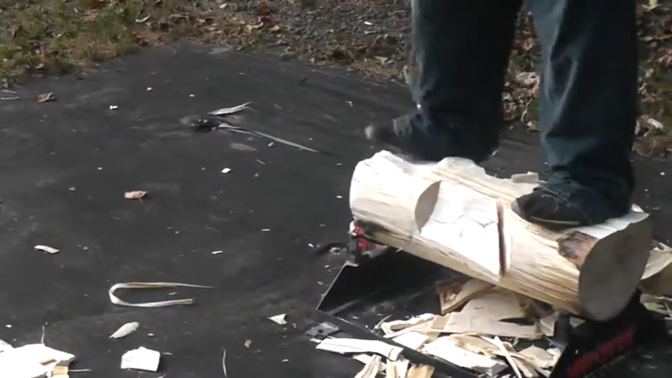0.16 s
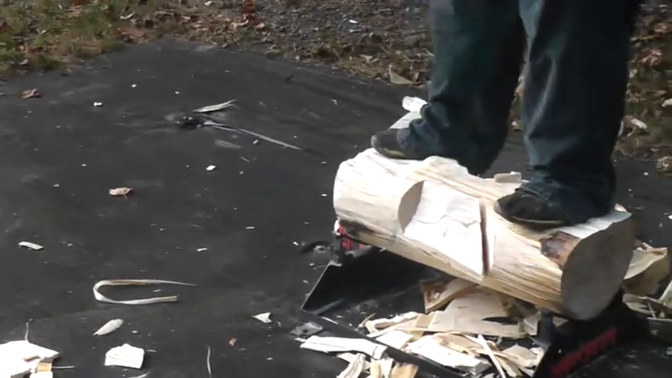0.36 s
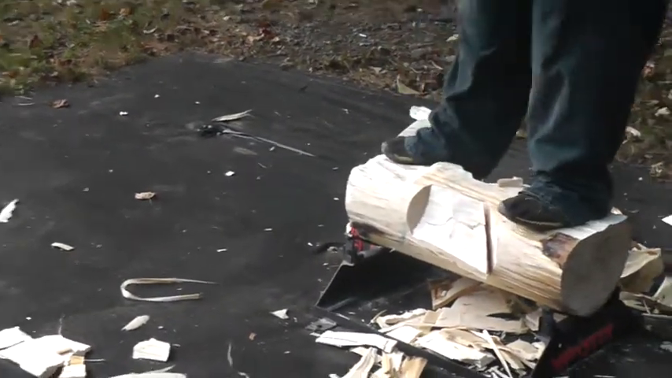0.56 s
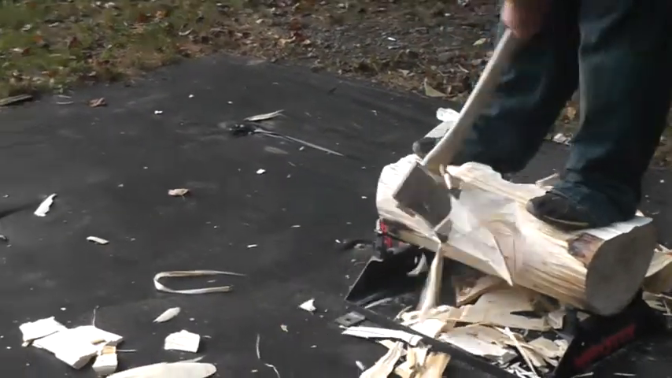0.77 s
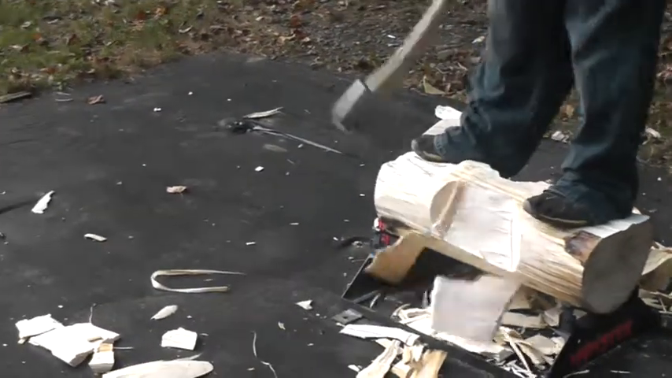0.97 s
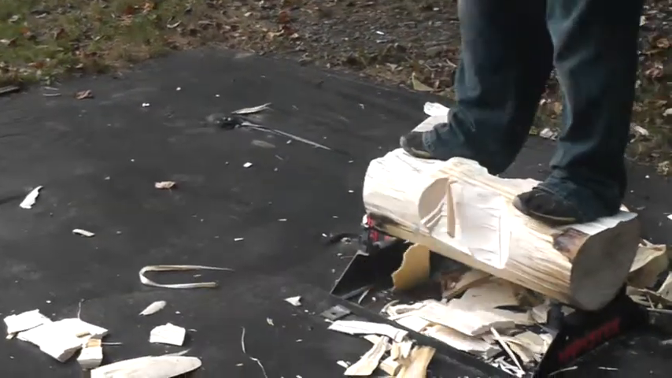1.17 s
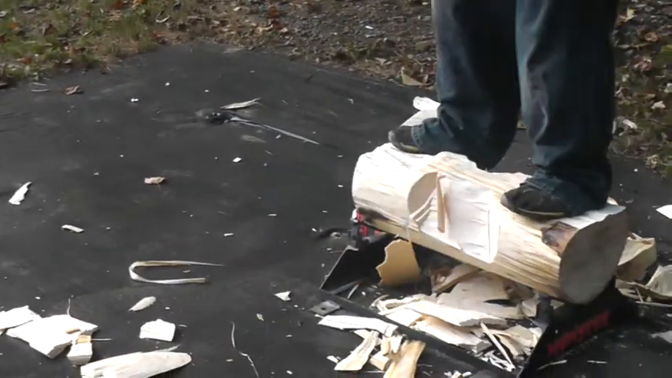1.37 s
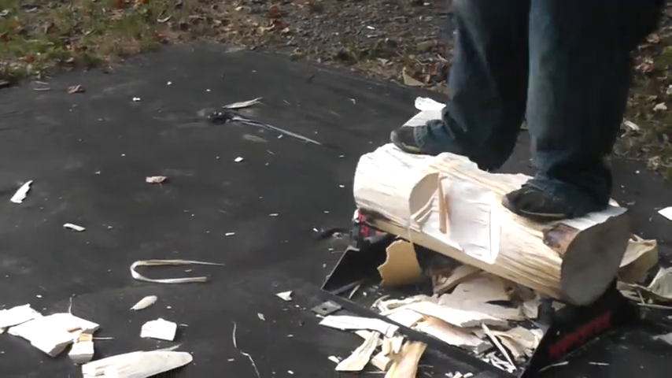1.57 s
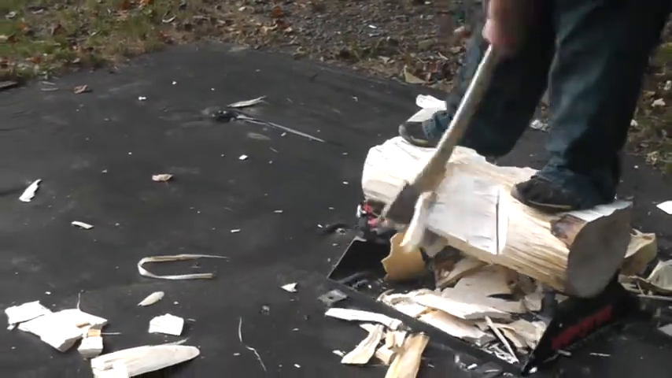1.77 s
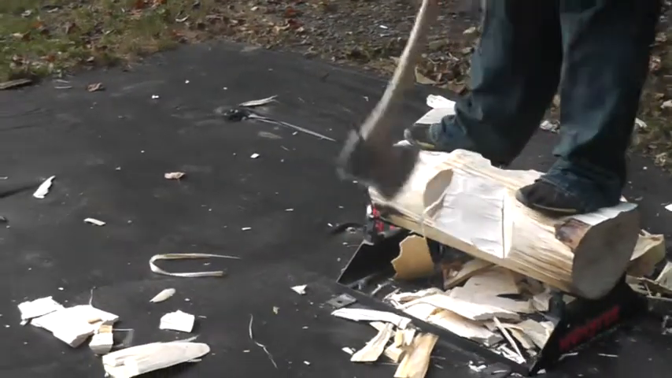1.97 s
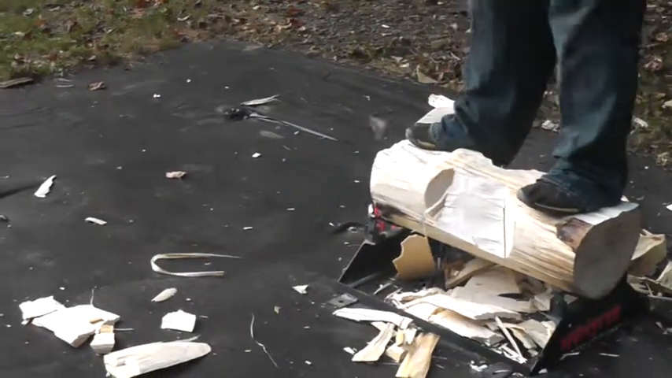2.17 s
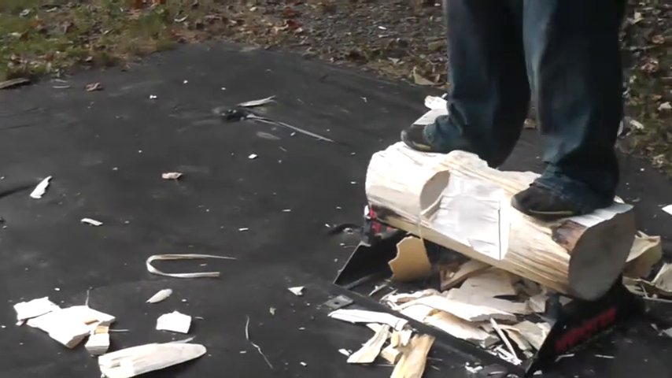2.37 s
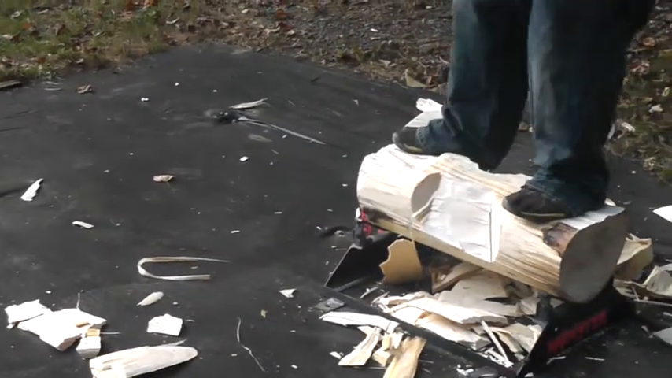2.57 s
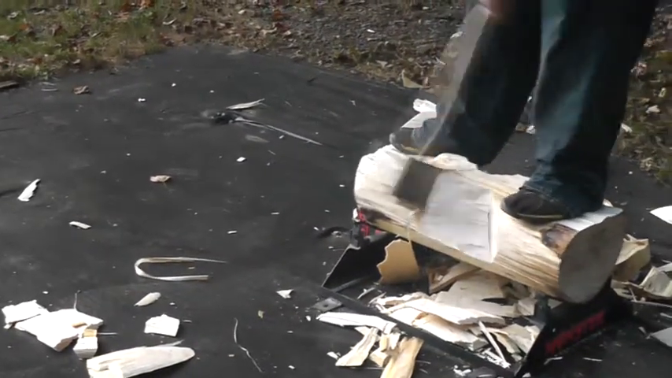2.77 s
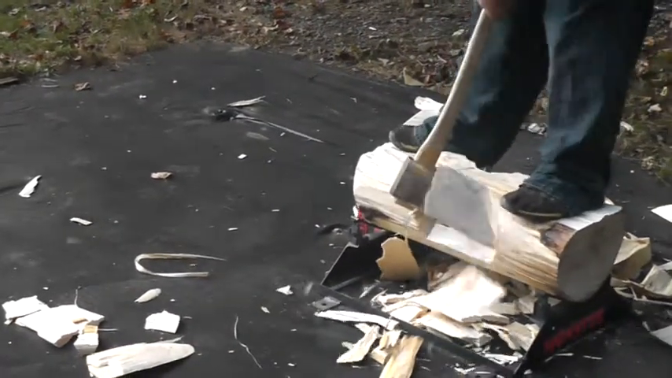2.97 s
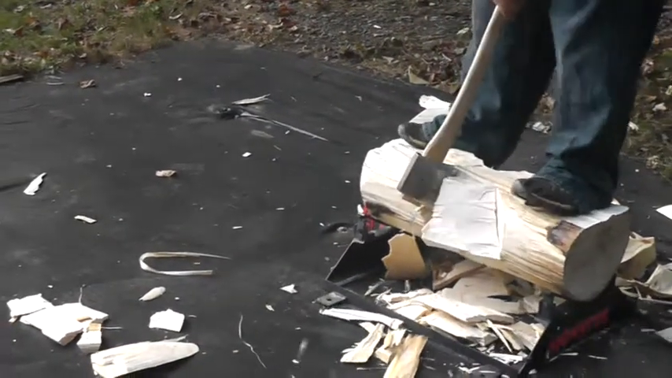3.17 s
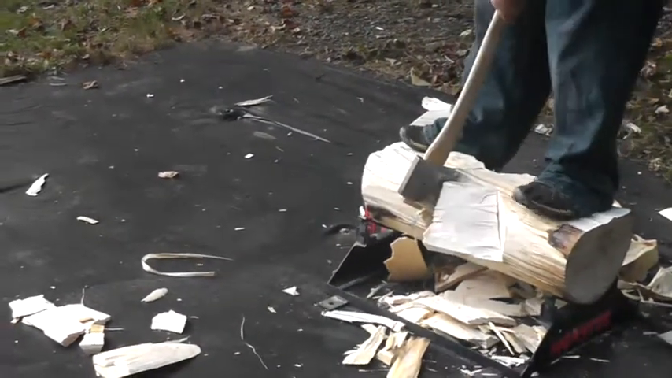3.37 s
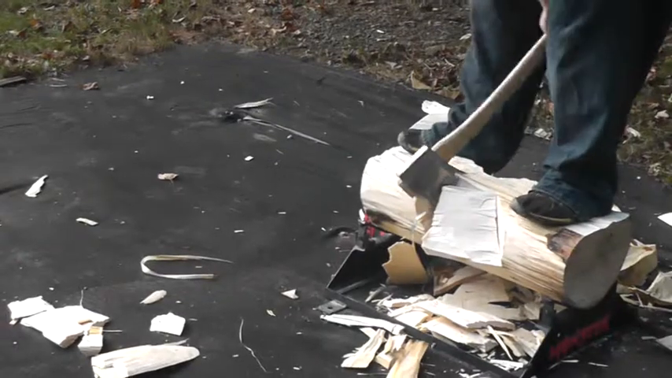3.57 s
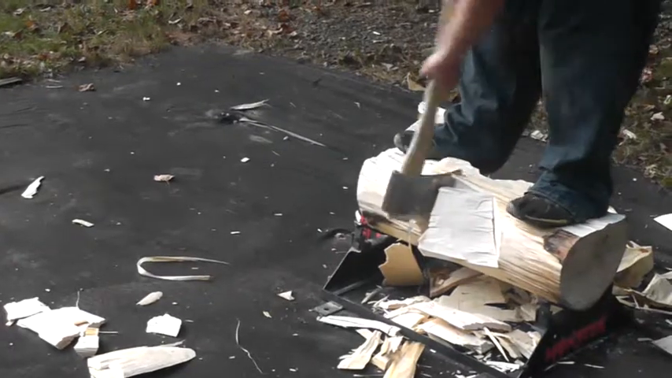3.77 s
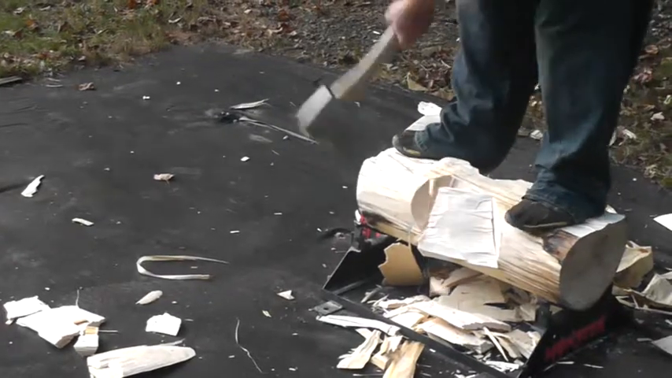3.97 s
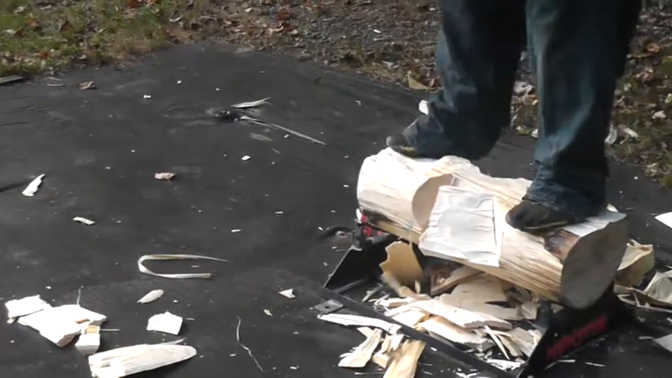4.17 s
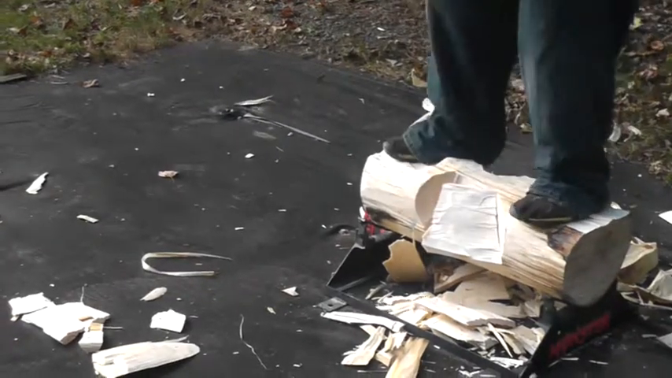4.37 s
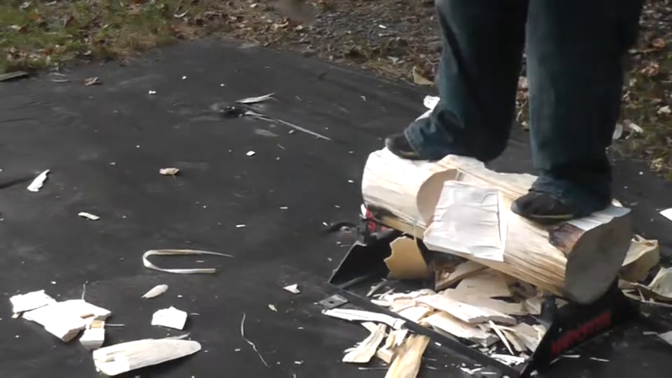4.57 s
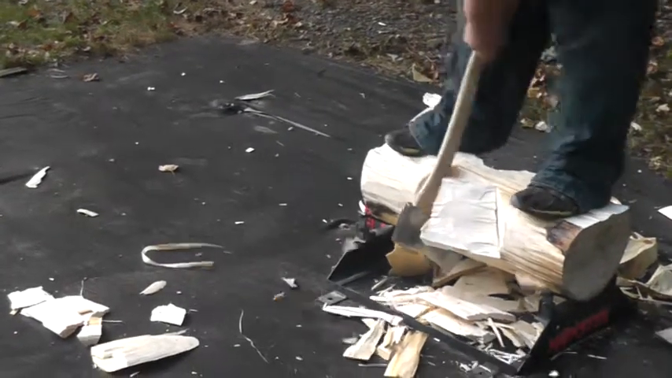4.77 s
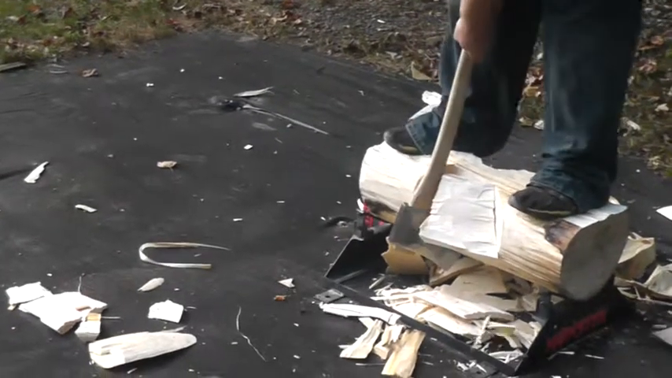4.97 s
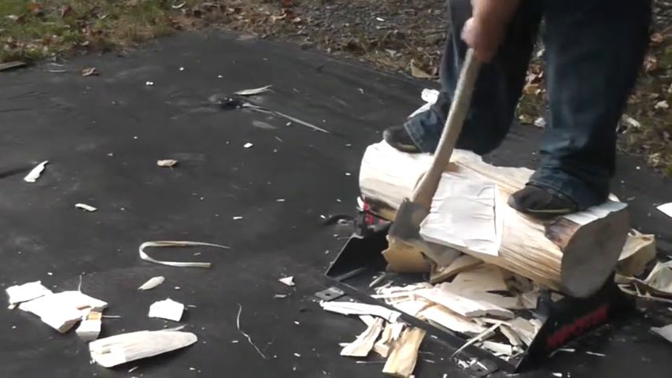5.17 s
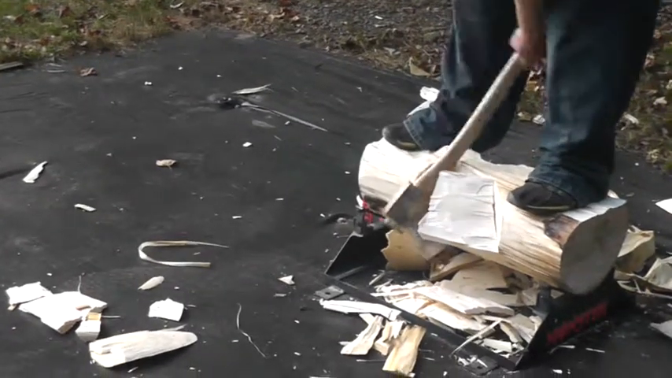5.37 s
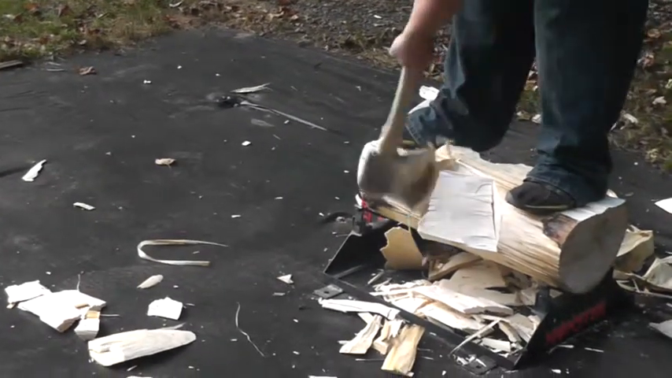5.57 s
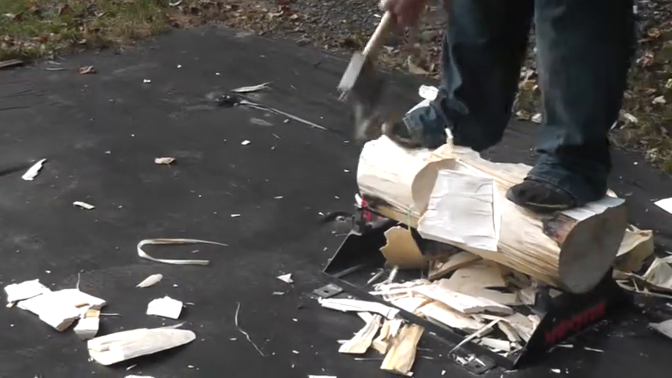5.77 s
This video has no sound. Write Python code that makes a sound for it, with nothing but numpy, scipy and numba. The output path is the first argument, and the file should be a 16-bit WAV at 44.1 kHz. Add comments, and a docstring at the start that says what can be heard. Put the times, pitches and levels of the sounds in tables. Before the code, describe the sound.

An axe bites four times into a log outdoors, each crack echoing off nearby walls, with chips tumbling and insects hissing steadily behind.

```python
"""Insects hiss in narrow bands over a far drone, small things rustle and knock, a far bird chips.
Then an axe swishes down and bites four times into a log in a yard; chips tumble, the blade is worked free.
Hisses, rustles and echoes are filtered noise, wood and ground are damped modes, the bird is sliding sines.
Two walls and the trees behind them throw each blow back. Table levels are those ahead of the recorder."""
import sys
import numpy as np
from scipy import signal
from scipy.fft import rfft, irfft
from scipy.io import wavfile
from scipy.ndimage import uniform_filter1d
from numba import njit

SR = 44100
rng = np.random.default_rng(int(sys.argv[2]) if len(sys.argv) > 2 else 0)


def generate_wav(signal):
    """Clip the signal to [-1, 1] and save it as 16-bit WAV at the path in sys.argv[1]."""
    frames = np.transpose(np.atleast_2d(signal))
    scaled = np.clip(frames, -1, 1) * 32767
    pcm = np.round(scaled).astype(np.int16)
    wavfile.write(sys.argv[1], SR, pcm)


N = 256220

# axe blows: t/s, crack level/dB, boom level/dB, thud level/dB, knock level/dB, snap level/dB,
# favoured thud f/Hz, favoured knock f/Hz, bite length/s, near wall level/dB, far wall level/dB,
# body left minus right/dB
BLOWS = [(.740, -11.5, -34, -21, -10, -27, 316, 1040, 0.0027, -12, -21, -4),
         (1.8065, -13, -52, -13, -12.5, -19, 197, 1130, 0.003, -12.5, -4, -.6),
         (2.8489, -16, -23, -16, -9.5, -14.5, 300, 886, 0.008, -9, -38, -4),
         (4.7575, -18.5, -32, -14.5, -10.5, -15, 279, 730, 0.011, -12, -4.5, -1.2)]
# scattered return from the trees: lag t/s, t60/s, rise/s
TREES = (0.028, 0.45, 0.17)
SIDES = np.array([[1], [-1]])  # sign at the left and right microphones


def undb(db):
    """Decibels to gain."""
    return 10 ** (np.asarray(db) / 20)


def level(x, db):
    """Scale to an rms level."""
    return x * undb(db) / np.sqrt(np.mean(x ** 2))


def curve(points, s):
    """Read a table of (s, value) along straight lines."""
    return np.interp(s, *np.transpose(points))


@njit
def svf(x, g, k):
    """State-variable band-pass with a moving centre, gain 1 there."""
    y = np.empty(len(x))
    band_state, low_state = 0., 0.
    for i in range(len(x)):
        v = (band_state + g[i] * (x[i] - low_state)) / (1 + g[i] * (g[i] + k))
        band_state = 2 * v - band_state
        low_state += 2 * g[i] * v
        y[i] = k * v
    return y


def band(n, hz, width, steep=False):
    """Noise of rms 1 in a resonance, passed through it twice if steep."""
    g = np.tan(np.pi * np.clip(hz, 20, .45 * SR) / SR) + np.zeros(n)
    k = width / np.mean(hz)
    x = svf(rng.standard_normal(n), g, k)
    if steep:
        x = svf(x, g, k)
    return level(x, 0)


def walk(rate):
    """Random levels of spread 0.86, rate of them a second, joined by straight lines."""
    k = int(N * rate / SR) + 2
    return 0.86 * np.interp(np.arange(N) * rate / SR, np.arange(k), rng.standard_normal(k))


def fade(n, t60, rise, lag=0.):
    """Silent for lag s, then a soft rise and an exponential fall."""
    t = np.maximum(np.arange(n) / SR - lag, 0)
    return (1 - np.exp(-t / max(rise, 1e-5))) * undb(-60 * t / max(t60, .002))


def ring(n, modes, rise, lag=0., apart=0.23):
    """Damped modes (Hz, dB, t60), each struck differently, out of step at the two microphones; peak 1."""
    t = np.arange(n) / SR
    chance = rng.standard_normal((len(modes), 4))
    x = np.zeros((2, n))
    for (hz, db, t60), (strike, detune, shift, lead) in zip(modes, chance):
        phase = 0.93 * shift + apart * np.sign(lead) * SIDES
        wave = np.sin(2 * np.pi * hz * (1 + 0.022 * detune) * (t - lag) + phase)
        x += undb(db + 5.2 * strike) * wave * fade(n, t60, rise, lag)
    return x / np.abs(x).max()


def add(out, x, s, pan_db):
    """Mix a sound in at s seconds, left raised over right by pan_db."""
    i = int(s * SR)
    x = x * undb(np.array([[pan_db], [-pan_db]]) / 2)
    out[:, i:i + x.shape[1]] += x[:, :N - i]


def wide(make, spread):
    """Left and right from a shared and an opposed noise."""
    return make() + spread * make() * SIDES


def echo(x, lag, t60, rise, spread):
    """Patchy, scattered return from a rough surface, energy 1 averaged over both microphones."""
    n = int((lag + t60 + 3 * rise) * SR)
    patches = undb(1.7 * np.repeat(rng.standard_normal(SR // 200), 200)[:n])
    answer = wide(lambda: rng.standard_normal(SR)[:n], spread) * fade(n, t60, rise, lag) * patches
    return signal.fftconvolve(x[None], answer / np.sqrt(np.sum(answer ** 2) / 2), axes=1)


def background():
    """Insect choirs in narrow bands that swell and drift, a far drone and a thin hiss of air."""
    # four insect choirs: f/Hz, width/Hz, flutter depth/dB, swell (t/s, level/dB)
    choirs = [(4190, 320, 3.95, [(0, -52), (1.3, -58.5), (1.6, -52.5), (2.3, -56.5), (2.62, -50),
              (3.3, -55), (3.85, -54), (5.15, -54.5), (5.45, -52), (5.81, -56.5)]),
              (4720, 690, 3.4, [(0, -56.5), (5.81, -57)]), (6250, 920, 0.98, [(0, -57), (5.81, -57)]),
              (8010, 770, 3.1, [(0, -60), (.47, -74), (1.2, -71), (1.3, -60), (1.6, -63), (3.3, -73),
              (3.85, -63), (4.1, -75), (5.15, -71), (5.45, -65), (5.81, -62)])]
    # colour of the far drone, relative: f/Hz, level per Hz/dB
    drone_colour = [(15, -52), (25, -28), (119, 6.5), (397, -11.5), (668, -12.5), (806, -10), (1700, -18),
                    (2230, -20.5), (3310, -67), (3600, -14.5), (4680, -42), (7920, -120)]
    out = undb(-59.5) * wide(lambda: band(N, 6570, 3900, steep=True), 0.2)  # air
    for hz, width, flutter_db, swell in choirs:
        drift = hz * (1 + .006 * walk(6))
        db = curve(swell, np.arange(N) / SR) + flutter_db * walk(12) + 0.56 * walk(45)
        out += undb(db) * wide(lambda: band(N, drift, width, steep=True), 0.22)
    f, per_hz_db = np.transpose(drone_colour)
    bins_hz = np.arange(1, N // 2 + 2) * SR / N
    colour = undb(np.interp(np.log(bins_hz), np.log(f), per_hz_db))
    drone = wide(lambda: irfft(rfft(rng.standard_normal(N)) * colour, N), 0.58) * undb(0.87 * walk(8.8))
    return out + level(drone, -54.5)


def shuffle():
    """A grainy rustle that flares when things are stirred and dies away; tiny contacts make it flicker."""
    # clothes, boots and loose chips set moving: loudest t/s, low level/dB, high level/dB, t60/s
    stirs = [(.27, -61, -55, 0.53), (.68, -48, -68, 1.5), (.85, -42, -39, 1.28), (1.17, -55, -52, 0.65),
             (1.32, -52.5, -65, 2.4), (1.67, -52.5, -45, 0.72), (1.95, -48.5, -48.5, 3.4),
             (2.22, -56, -57, 1.1), (2.93, -44, -43.5, 1.33), (3.23, -49.5, -56, 0.71),
             (3.51, -56, -47.5, 1.03), (4.27, -57, -50.5, 0.5), (4.83, -38.5, -38.5, 0.47),
             (5.0, -49.5, -53.5, 1.5), (5.55, -62, -51, 1.1)]
    rise_db_s, still_low_db, still_high_db = 154, -64, -68
    t = np.arange(N) / SR
    low_power, high_power = undb(still_low_db) ** 2, undb(still_high_db) ** 2
    for s, low_db, high_db, t60 in stirs:
        shape_db = np.where(t < s, rise_db_s * (t - s), -60 * (t - s) / t60)
        low_power = low_power + undb(low_db + shape_db) ** 2
        high_power = high_power + undb(high_db + shape_db) ** 2

    def low_noise():
        """Three overlapping bands of rustle."""
        x = band(N, 852, 540, steep=True) + undb(-0.5) * band(N, 367, 167)
        return x + undb(-4.0) * band(N, 1380, 1400, steep=True)

    low = wide(low_noise, 0.56)
    high = wide(lambda: band(N, 5670, 6500, steep=True), 0.11)
    low_flicker = undb(3.04 * walk(70) + 2.3 * walk(220))
    high_flicker = undb(2.7 * walk(72))
    return np.sqrt(low_power) * low_flicker * low + np.sqrt(high_power) * high_flicker * high


def knocks():
    """Each small knock: a short wooden ring, a thud of the ground, a dry tick and a settling rattle."""
    # chips, boots and the blade in the cut; 1.878 and 4.829 are knocks thrown back by the near wall:
    # t/s, ring level/dB, ring f/Hz, ring t60/s,
    # ground thud level/dB, overtones level/dB, first overtone f/Hz, tick level/dB
    small_knocks = [(.043, -30.5, 980, 0.0069, -43.5, -47.5, 1660, -53),
                    (.084, -62, 1050, 0.024, -55, -45, 1570, -37),
                    (.176, -40, 990, 0.0074, -70, -43, 1600, -35),
                    (.282, -37, 850, 0.011, -53, -45, 1610, -32),
                    (.304, -35.5, 855, .016, -47, -44, 1870, -40),
                    (.936, -13.5, 850, 0.008, -18.5, -25, 1670, -20.5),
                    (.954, -31, 540, .02, -45, -48, 2020, -27),
                    (0.989, -36, 814, .018, -44, -45, 1750, -22.5),
                    (.999, -29.5, 864, 0.033, -39, -32.5, 1850, -24),
                    (1.019, -27.5, 860, 0.016, -31, -42, 1610, -26),
                    (1.034, -36, 1080, 0.016, -32, -35, 1630, -29),
                    (1.094, -33.5, 697, 0.013, -35, -53, 1860, -50),
                    (1.145, -37, 940, 0.014, -38, -40, 1970, -33),
                    (1.165, -32, 1100, 0.011, -42, -53, 1580, -33),
                    (1.176, -16.5, 924, 0.012, -21, -33, 1410, -25.5),
                    (1.199, -26, 495, 0.017, -25, -32, 2330, -24.5),
                    (1.226, -44, 689, .018, -28.5, -52, 1920, -40),
                    (1.25, -37.5, 794, .02, -37, -41.5, 2340, -39),
                    (1.302, -38, 865, 0.0092, -35, -38, 1490, -29.5),
                    (1.311, -43, 552, 0.014, -26.5, -42, 1530, -40),
                    (1.327, -39, 547, 0.014, -28.5, -51, 1510, -45),
                    (1.383, -46, 1150, 0.022, -24.5, -50, 2070, -54),
                    (1.412, -37, 580, 0.015, -28, -50, 1470, -52),
                    (1.463, -49, 577, .023, -36.5, -61, 1480, -54),
                    (1.604, -43.5, 850, .023, -36, -42, 2530, -43),
                    (1.878, -23, 900, 0.025, -24, -29, 1700, -34),
                    (2.063, -29.5, 726, 0.021, -45, -39, 1890, -30),
                    (2.082, -27.5, 940, .009, -40.5, -39, 2700, -22.5),
                    (2.105, -48, 980, .02, -47, -53, 1800, -31),
                    (2.15, -28.5, 850, 0.031, -44, -41, 1650, -45),
                    (2.188, -30.5, 754, 0.028, -54, -40, 1990, -32.5),
                    (2.234, -34, 820, .012, -49, -52, 1650, -40),
                    (2.263, -29.5, 880, 0.0081, -57, -38, 1840, -38),
                    (2.284, -35.5, 770, .02, -57, -42, 1450, -35),
                    (2.308, -41, 880, .02, -54, -52, 1450, -46),
                    (2.328, -47, 950, .028, -55, -57, 1870, -36),
                    (2.384, -35, 880, 0.0059, -47, -44, 1520, -37),
                    (2.67, -27, 870, 0.0058, -46, -44, 1750, -29),
                    (3.151, -18, 1026, 0.014, -28, -50, 1630, -28),
                    (3.18, -12, 910, 0.013, -19, -25.5, 1800, -27),
                    (3.261, -33, 1030, .028, -42, -51, 1790, -45),
                    (3.3, -37, 960, 0.011, -42, -41, 1600, -36),
                    (3.324, -35.5, 960, .014, -38.5, -51, 1580, -44),
                    (3.369, -32.5, 860, 0.015, -47, -35, 1800, -42),
                    (3.447, -33.5, 725, 0.092, -35.5, -27, 1880, -20.5),
                    (3.473, -29, 1210, 0.011, -34.5, -25, 2030, -34),
                    (3.481, -30.5, 720, 0.028, -37, -30, 1920, -31),
                    (3.502, -23.5, 970, 0.022, -33.5, -24, 1440, -25),
                    (3.547, -46, 540, .017, -46, -38.5, 1750, -42),
                    (3.581, -28, 840, 0.012, -37.5, -33.5, 1560, -28),
                    (3.7, -21, 1055, 0.011, -50, -29.5, 1940, -34),
                    (3.805, -31.5, 810, 0.021, -60, -47.5, 1900, -49),
                    (4.08, -42, 942, 0.014, -48, -50, 2230, -38.5),
                    (4.249, -40, 694, .012, -58, -45, 1490, -48),
                    (4.283, -37, 603, 0.01, -45, -43.5, 2450, -50),
                    (4.33, -55, 1020, .02, -47, -58, 2190, -32),
                    (4.829, -23, 790, .02, -26, -30, 1710, -35), (5.12, -52, 900, .02, -57, -54, 1800, -47),
                    (5.167, -30, 776, 0.028, -53, -20, 1610, -20),
                    (5.202, -32.5, 770, 0.031, -44, -22.5, 1650, -27.5),
                    (5.228, -60, 565, .025, -32, -38, 1680, -44),
                    (5.542, -42, 1120, .015, -54, -44, 2010, -32),
                    (5.561, -22, 1160, 0.033, -56, -33, 2890, -29),
                    (5.567, -50, 1050, 0.046, -52, -43, 2540, -20),
                    (5.579, -43, 910, 0.023, -44, -45, 2560, -34),
                    (5.597, -52, 1080, .018, -55, -40, 1860, -29),
                    (5.622, -38, 760, .02, -30, -39, 2630, -36),
                    (5.693, -58, 1150, .017, -54, -56, 1680, -34)]
    # where the small knocks lie: t/s, left minus right/dB
    knock_pan = [(0, -5), (1.3, -6.5), (3.2, -2.5), (5.8, -2.2)]
    # main modes of a knock: multiple of the ring f, level/dB
    main_modes = [(1, 8), (1.14, -2.5), (1.37, -9), (.68, -14)]
    # upper modes of a knock: multiple of the first overtone f, level/dB
    upper_modes = [(1, 4.5), (1.5, -3.5), (2.1, -13)]
    # the sheet on the ground: f/Hz, level/dB, t60/s
    ground_modes = [(285, 0, .022), (200, -12, .03), (390, -10, .02)]
    tick_t60_s, overtone_t60_s = 0.016, .022  # the second for the first overtone, shorter above
    out, n = np.zeros((2, N)), int(.12 * SR)
    for s, ring_db, hz, t60, thud_db, over_db, over_hz, tick_db in small_knocks:
        pan_db = curve(knock_pan, s)
        wood = ring(n, [(hz * m, d, t60) for m, d in main_modes], 0.0033)
        rattle = wide(lambda: band(n, 596, 850, steep=True), 0.33) * fade(n, 0.16, 0.001)
        thud = ring(n, ground_modes, 0.0062)
        body = undb(ring_db) * (wood + undb(-17) * rattle) + undb(thud_db) * thud
        add(out, body, s + 0.001487, pan_db)

        overtones = ring(n, [(over_hz * m, d, overtone_t60_s / m) for m, d in upper_modes], 0.00032, 0, 0.26)
        overtones = overtones + undb(-1.0) * band(n, 3300, 2400) * fade(n, tick_t60_s, 0.0001)
        tick = wide(lambda: band(n, 6470, 5300, steep=True), 0.13) * fade(n, tick_t60_s, 0.00055)
        # the treble reaches both microphones more evenly
        add(out, undb(over_db) * overtones + undb(tick_db) * tick, s + 0.00052, 0.18 * pan_db)
    return out


def bird():
    """A far bird's chips: short sine whistles that slide down."""
    # falling chips: t/s, peak level/dB, middle f/Hz
    chirps = [(.1894, -59, 4760), (.2165, -47, 4660), (1.6294, -50, 4380), (1.6583, -46, 4520),
              (2.164, -45, 4450), (2.219, -43.5, 4600), (2.2794, -50, 4870), (2.579, -50, 4810),
              (2.603, -48, 4540), (2.647, -44.5, 4690), (3.0834, -49, 4360), (3.131, -39.5, 4670),
              (3.55, -47, 4500), (3.595, -44, 4550), (3.994, -42, 4360), (4.0164, -42.5, 4370),
              (4.042, -45, 4370), (4.52, -47, 4800), (5.3687, -50, 4440), (5.409, -47, 4650),
              (5.4535, -44.5, 4660)]
    out, n = np.zeros((2, N)), int(0.027 * SR)
    for s, db, hz in chirps:
        slide = hz * (1 + np.linspace(.045, -.045, n))
        whistle = np.sin(2 * np.pi * np.cumsum(slide) / SR) * np.hanning(n)
        add(out, undb(db) * whistle, s, 0)
    return out


def scrapes():
    """Dense stick-slip grains excite a woody band and a dry hiss."""
    # wood or blade dragged along wood: start t/s, length/s, level/dB
    drags = [(0.274, .03, -46), (1.157, 0.035, -43.5), (2.251, 0.034, -42.5), (3.5, 0.032, -45),
             (5.55, .055, -38)]
    out = np.zeros((2, N))
    for s, length, db in drags:
        n = int(length * SR)
        grains = undb(9.7 * uniform_filter1d(rng.standard_normal(n), size=40)) * np.hanning(n) ** 0.54

        def rub():
            """Dry hiss over two woody bands."""
            x = band(n, 5360, 6000, steep=True) + undb(-7.5) * band(n, 2230, 1300)
            return x + undb(-4) * band(n, 1100, 400)

        add(out, undb(db) * grains * wide(rub, 0.15), s, -1.2)
    return out


def swings():
    """Air tears at the thin blade (hiss) and sheds from the handle (whoosh), louder with speed.

    The hiss also climbs in pitch; both ease off after the fastest moment."""
    # downswings: start t/s, fastest t/s, blade hiss level/dB, handle whoosh level/dB
    downswings = [(0.534, 0.712, -30, -44.5), (1.682, 1.772, -30, -47), (2.628, 2.835, -30.5, -47.5),
                  (4.637, 4.751, -29.5, -43)]
    # short swish as the head turns over: t/s, level/dB
    turns = [(1.672, -45), (2.682, -49.5), (4.604, -42.5)]
    hiss_db_per_decade, whoosh_db_per_decade = 44.5, 27.5  # against speed
    slow_hz, fast_hz, ease_db_s, turn_half_width_s = 6700, 7280, -150, 0.028
    out = np.zeros((2, N))
    for (start, fastest, hiss_db, whoosh_db), blow in zip(downswings, BLOWS):
        t = np.arange(blow[0] - .25, blow[0] + .03, 1 / SR)
        n = len(t)
        speed = np.clip((t - start) / (fastest - start), .01, 1)  # share of the fastest
        ease_db = ease_db_s * np.maximum(t - fastest, 0)
        turn = sum(undb(db) * np.exp(-((t - s) / turn_half_width_s) ** 2) for s, db in turns)
        hiss = band(n, slow_hz + (fast_hz - slow_hz) * speed, 7000, steep=True)
        hiss = hiss + undb(-9.0) * band(n, 1540, 4000)
        whoosh = band(n, 335, 62) + undb(-6.0) * band(n, 1086, 170) + undb(-27.0) * band(n, 1600, 740)
        hiss_gain = undb(hiss_db + hiss_db_per_decade * np.log10(speed) + ease_db) + turn
        whoosh_gain = undb(whoosh_db + whoosh_db_per_decade * np.log10(speed) + ease_db)
        swish = hiss_gain * hiss + whoosh_gain * whoosh
        add(out, swish, t[0], 0)
        add(out, undb(-11.5) * echo(swish, *TREES, 0.6), t[0], 0)
    return out


def blows():
    """Fibres crack as the edge bites, the log knocks, thuds as the blade stops and rocks on its stand.

    The walls and trees of the yard answer."""
    # the log's modes lying free: f/Hz, level/dB, t60/s
    log_modes = [(69, 0, 0.048), (137, -8, 0.04), (159.6, 0, 0.071), (219, -3, 0.097), (256, -6, 0.043),
                 (335, 2, 0.053), (398, 0, 0.03), (520, 0, 0.038), (675, 4.5, 0.038), (848, -2.5, 0.041),
                 (936, -1, 0.031), (1016, 0.5, 0.058), (1290, -2.5, 0.029), (1617, 0.5, 0.038),
                 (1951, -5.5, 0.048), (2583, -1.5, 0.036), (3170, 9, 0.017)]
    # near and far wall: lag t/s, t60/s, rise/s
    walls = [(0.064, 0.14, 0.016), (0.09, 0.025, 0.0051)]
    crack_t60_s, knock_lag_s, thud_lag_s = 0.02, 0.00301, 0.00735
    held_down = 0.66  # the boots shorten the log's ring by this factor
    air_and_leaves = signal.butter(2, [280, 8500], "bandpass", fs=SR, output="sos")
    out, n = np.zeros((2, N)), int(.3 * SR)
    for (s, crack_db, boom_db, thud_db, knock_db, snap_db, thud_hz, knock_hz, bite,
         near_db, far_db, pan_db) in BLOWS:
        tearing = undb(23.7 * uniform_filter1d(rng.standard_normal(n), size=30))
        fibre_noise = band(n, 6700, 8400, steep=True) + undb(-6.5) * band(n, 1240, 3400)
        fibre_noise = fibre_noise + undb(-12.5) * band(n, 10800, 7600)
        # slow fall during the bite, quick fall after it
        after_bite = undb(-60 * bite / 0.18) * fade(n, crack_t60_s, 0, bite)
        biting = np.where(np.arange(n) < bite * SR, fade(n, 0.068, 0.096 * bite), after_bite)
        crack = undb(crack_db) * tearing * fibre_noise * (biting + undb(-10.0) * fade(n, 0.073, 0.0019))

        # the spot that is hit favours the modes near one low and one middle pitch
        modes = []
        for f, d, t60 in log_modes:
            octaves_off = abs(np.log2(f / (thud_hz if f < 450 else knock_hz)))
            modes.append((f, d - 14 * min(octaves_off, .8), t60 * held_down))
        # boom, thud, knock, snap: level/dB, lowest f/Hz, highest f/Hz, lag/s, microphone phase/rad
        parts = ((boom_db, 0, 120, knock_lag_s, .6), (thud_db, 120, 450, thud_lag_s, .45),
                 (knock_db, 450, 1400, knock_lag_s, .4), (snap_db, 1400, 4000, knock_lag_s, .25))
        body = sum(undb(db) * ring(n, [m for m in modes if low < m[0] < high], 0.0028, lag, apart)
                   for db, low, high, lag, apart in parts)
        # the two microphones hear the long log's rumble differently
        rumble = wide(lambda: band(n, 257, 140) + undb(-3.0) * band(n, 750, 480), 0.48)
        rumble = rumble * fade(n, 0.25, 0.0006, knock_lag_s)
        # a slightly late copy of the crack, opposed at the two microphones, widens it
        crack_width = 0.14 * np.roll(crack, 9) * SIDES
        add(out, crack + crack_width, s, 0)
        add(out, body + undb(thud_db - 8.5) * rumble, s, pan_db)

        # air and leaves dull what comes back
        far = signal.sosfilt(air_and_leaves, crack + undb(-2) * body.mean(axis=0))
        for db, wall in zip((near_db, far_db), walls):
            add(out, undb(db) * echo(far, *wall, 0.16), s, -1.1)
        add(out, undb(-10) * echo(far, *TREES, 0.23), s, -1.1)
    return out


def scene():
    """All sources together at the two microphones."""
    return background() + shuffle() + knocks() + bird() + scrapes() + swings() + blows()


def record(dry):
    """The small recorder loses the deep bass, rounds the loudest peaks and cuts the top."""
    x = signal.sosfilt(signal.butter(1, 45, "highpass", fs=SR, output="sos"), dry)
    rounded = np.tanh(1.386 * x) / 1.221
    return signal.sosfilt(signal.ellip(10, .2, 90, 16100, fs=SR, output="sos"), rounded)


dry = scene()
out = record(dry)
generate_wav(out)
```